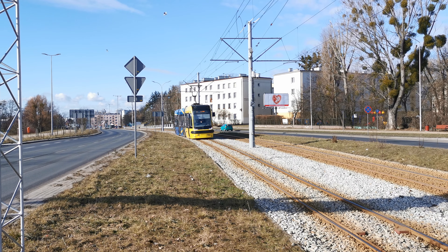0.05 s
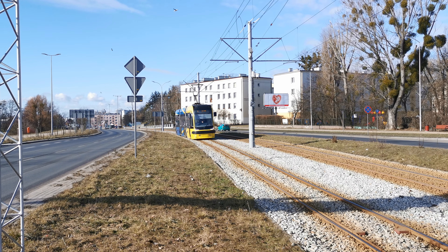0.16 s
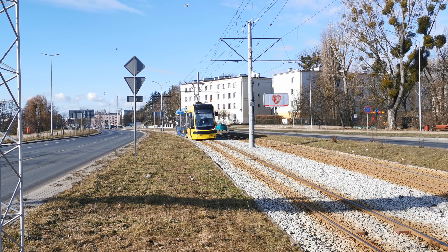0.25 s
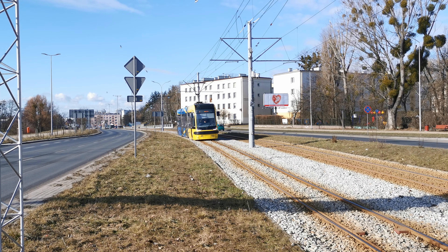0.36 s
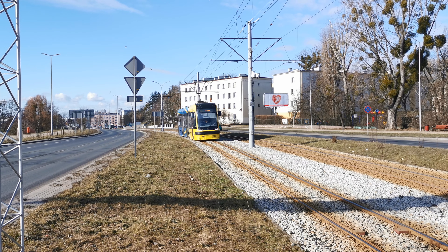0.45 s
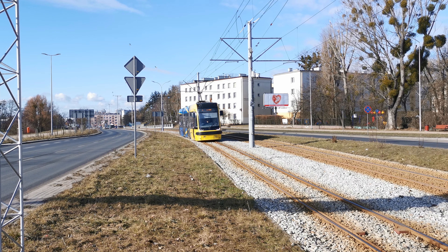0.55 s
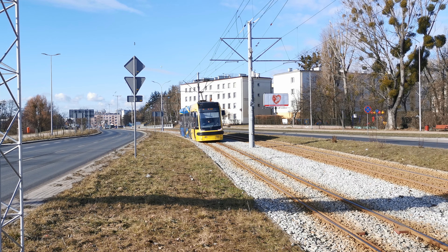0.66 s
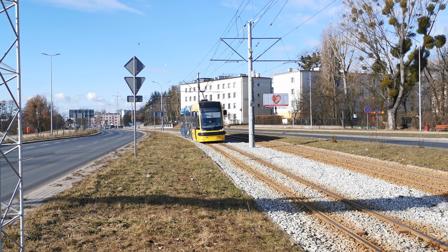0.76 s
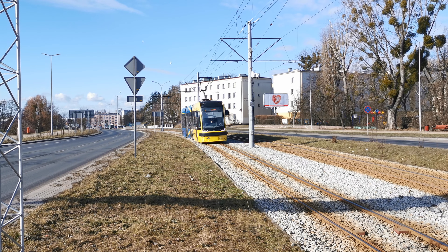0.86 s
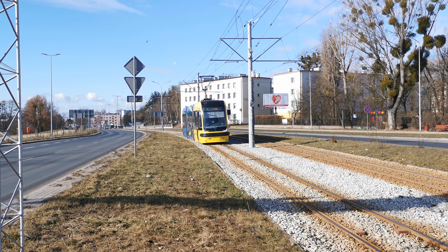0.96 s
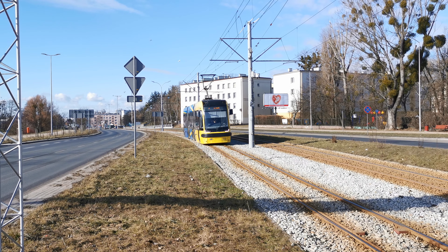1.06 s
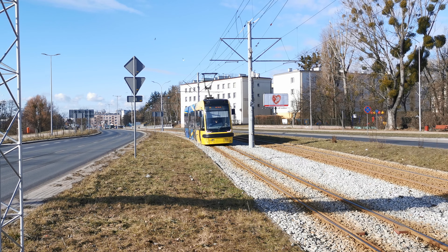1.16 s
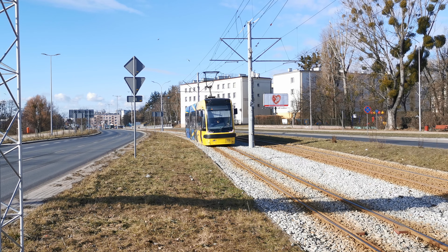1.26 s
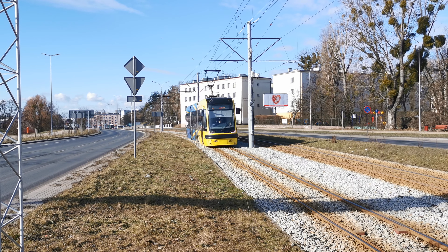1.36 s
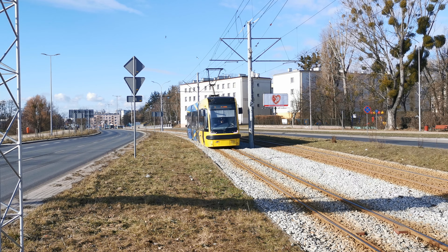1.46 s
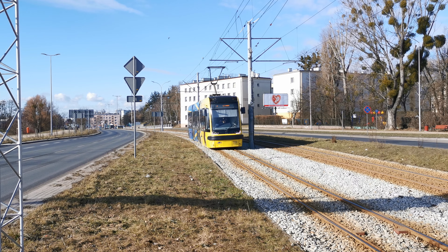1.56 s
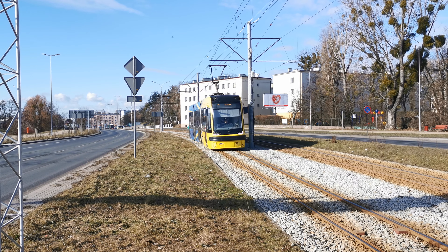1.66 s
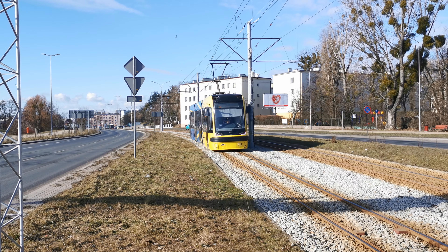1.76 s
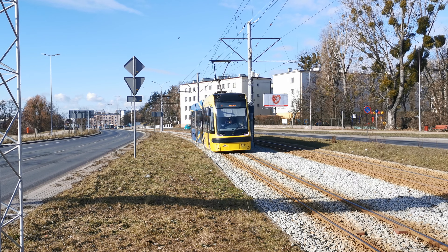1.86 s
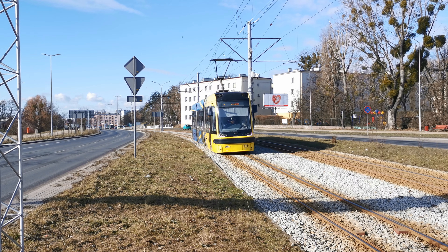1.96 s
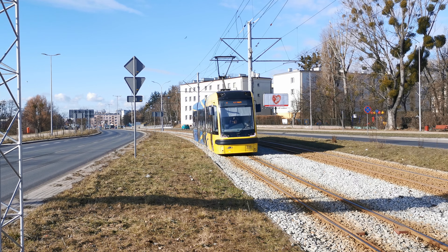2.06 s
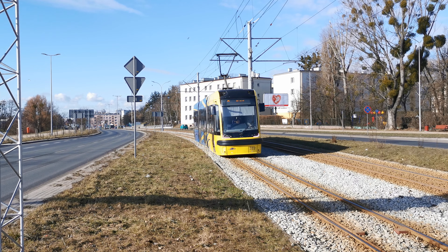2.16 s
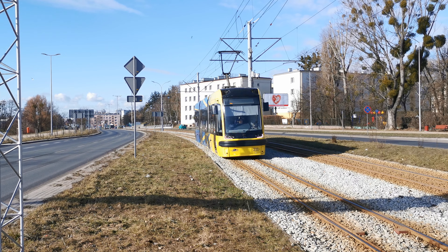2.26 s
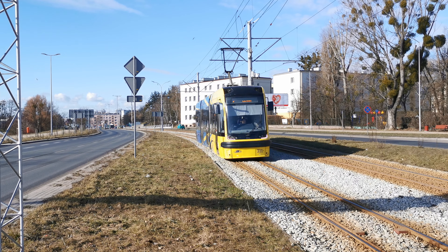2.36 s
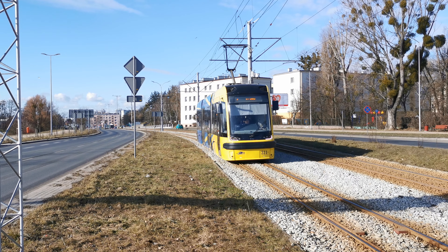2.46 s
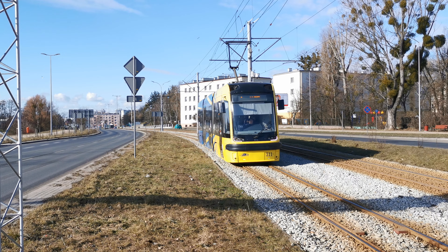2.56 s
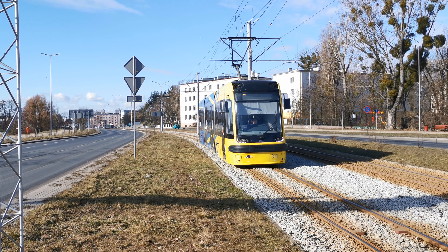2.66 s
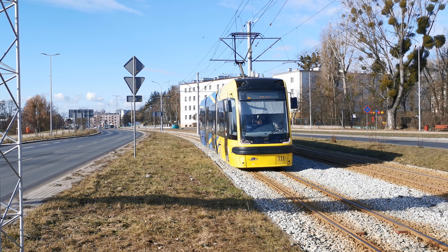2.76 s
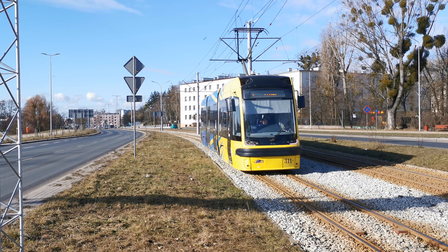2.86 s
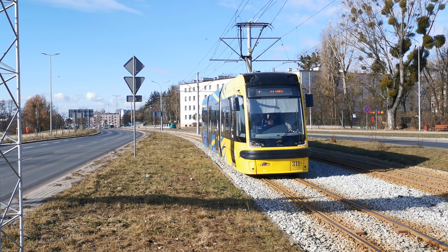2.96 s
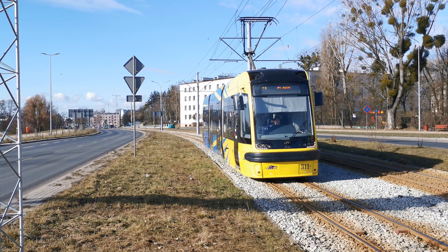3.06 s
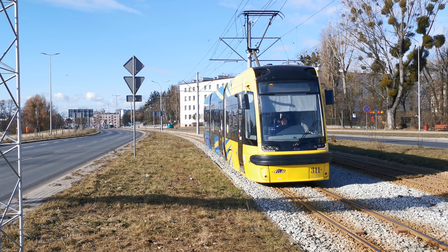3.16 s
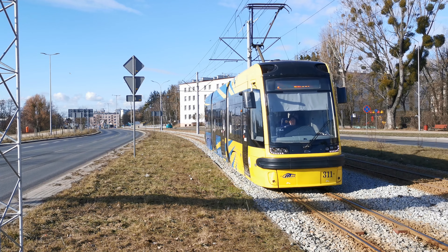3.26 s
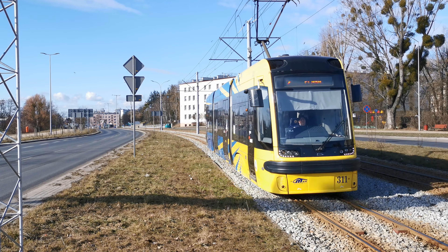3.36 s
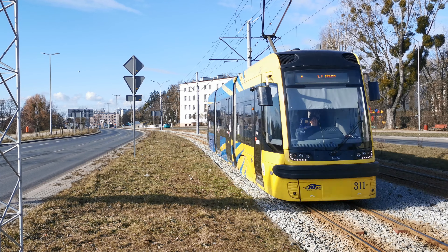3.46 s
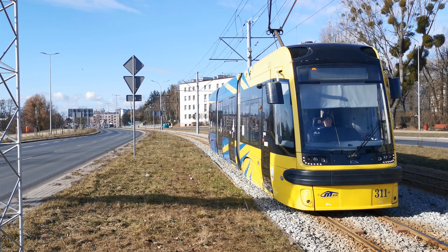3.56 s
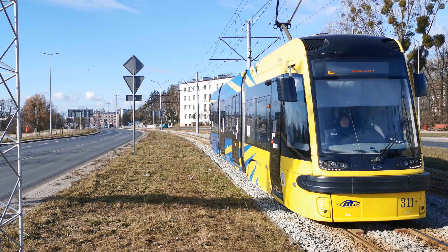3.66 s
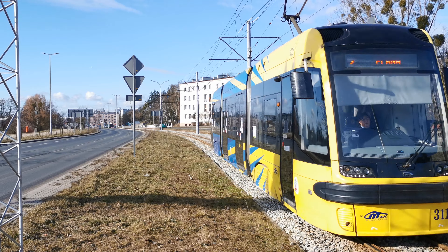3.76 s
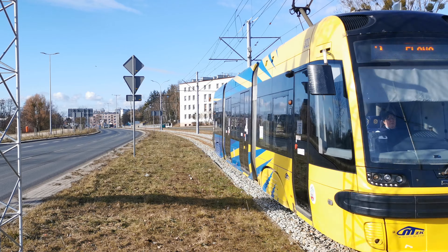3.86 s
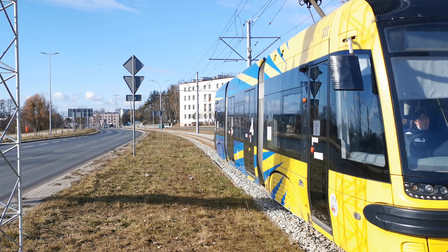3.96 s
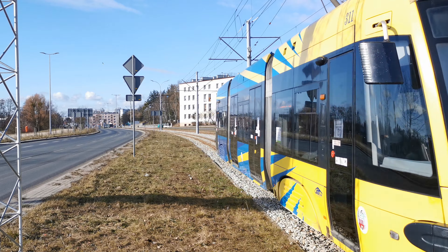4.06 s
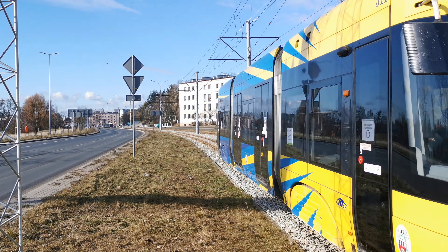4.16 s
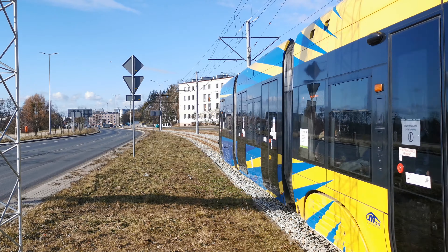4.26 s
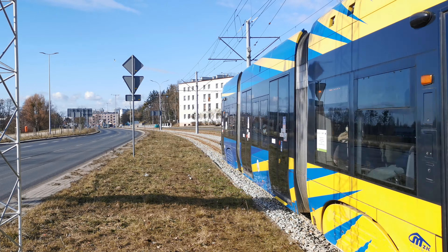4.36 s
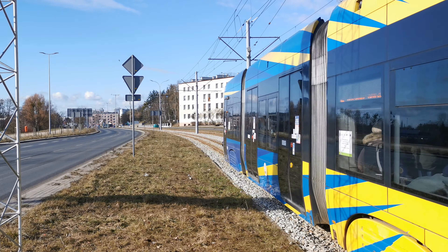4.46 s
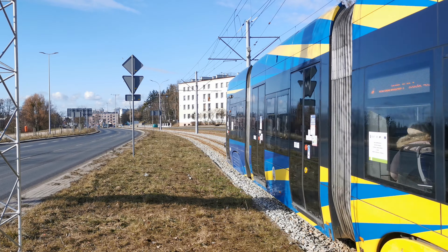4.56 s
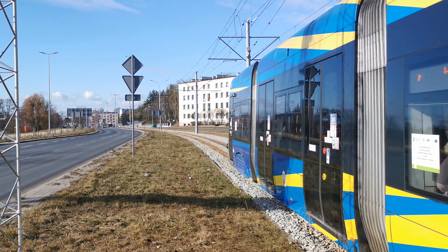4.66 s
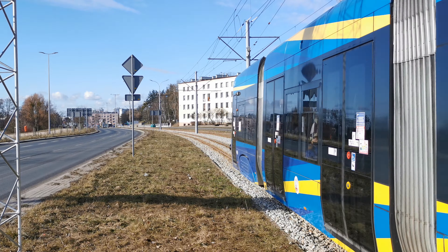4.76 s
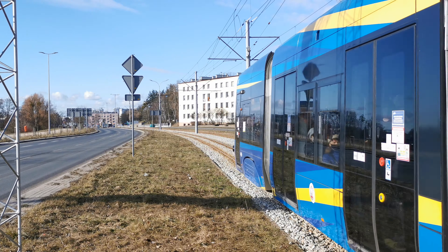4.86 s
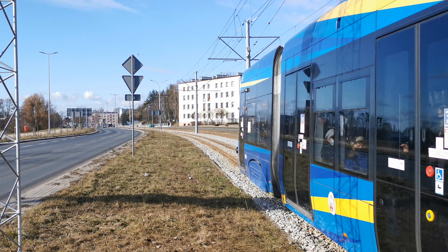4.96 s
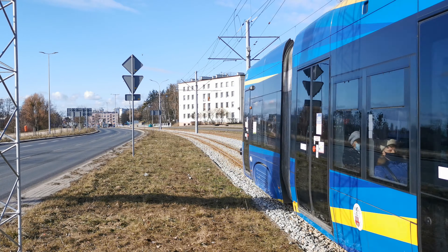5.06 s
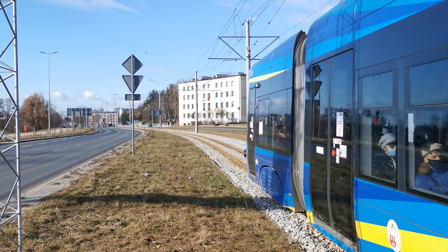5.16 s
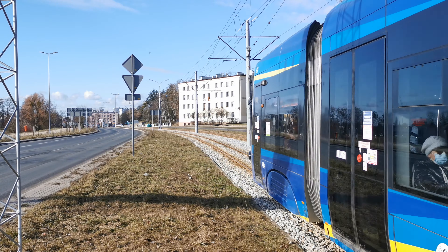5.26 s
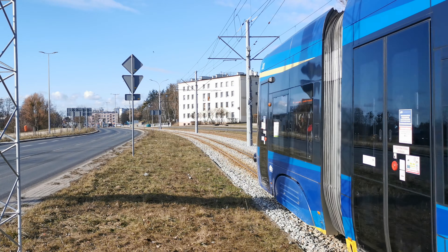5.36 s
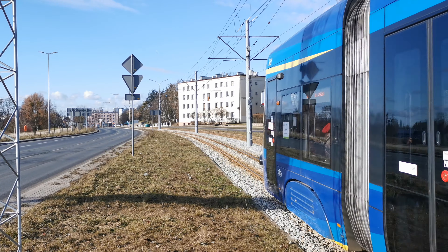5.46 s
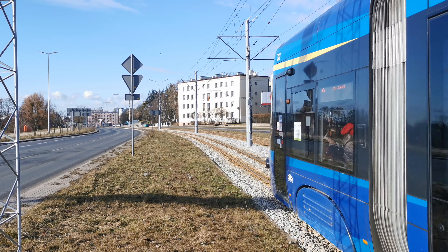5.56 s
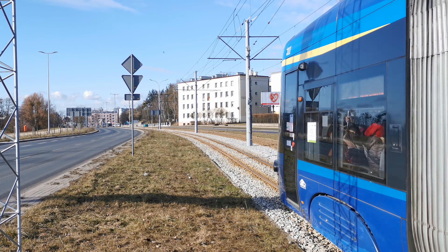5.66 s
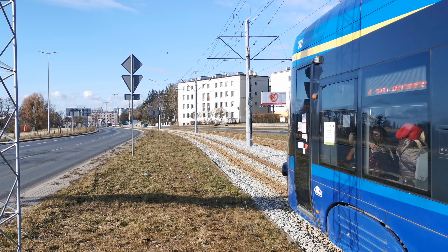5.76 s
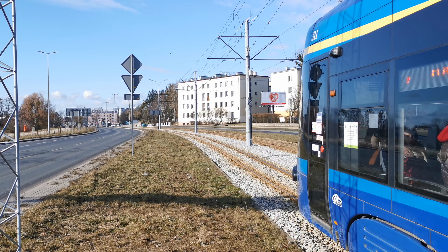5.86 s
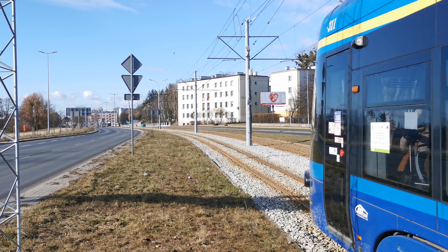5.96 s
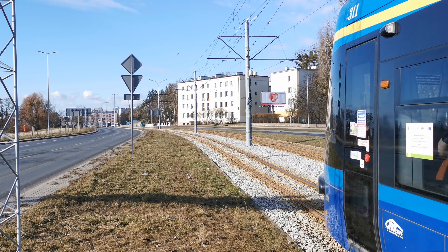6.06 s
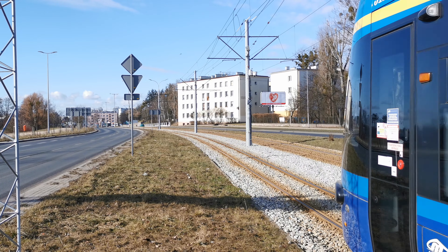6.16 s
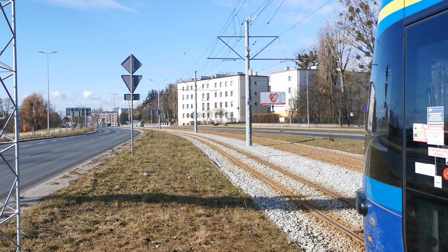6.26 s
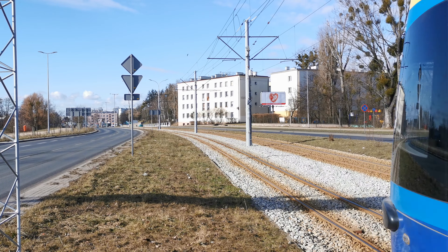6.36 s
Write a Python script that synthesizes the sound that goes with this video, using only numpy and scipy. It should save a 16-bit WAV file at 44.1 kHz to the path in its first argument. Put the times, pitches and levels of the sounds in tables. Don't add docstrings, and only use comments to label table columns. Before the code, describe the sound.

Outdoors beside ballasted track, a hand-held stereo microphone first catches quiet low traffic rumble and close, crisp jacket rustling. Two small buckle taps follow while a distant electric hum slowly sinks in pitch. After four seconds the tram surges past very close: rough wheel roar, throbbing gears, low axle thumps, singing metal and a thin flange squeal, still loud at the end.

```python
import sys
import numpy as np
from scipy import signal
from scipy.fft import rfft, irfft, next_fast_len
from scipy.io import wavfile
from scipy.ndimage import uniform_filter1d, map_coordinates

SR = 44100
rng = np.random.default_rng(int(sys.argv[2]) if len(sys.argv) > 2 else 0)


def undo_db(level):
    steps = np.asarray(level, float) / 20
    return 10 ** steps


def wav_out(sig):
    wavfile.write(sys.argv[1], SR, np.round(np.clip(np.atleast_2d(sig).T, -1, 1) * 32767).astype(np.int16))


N = 283284
ABREAST_DB = -32


def unit(x):
    return x / np.sqrt(np.mean(x ** 2) + 1e-20)


def along(points, hz):
    f, v = np.transpose(points)
    return np.interp(np.log(hz + 1), np.log(f + 1), v)


def curves(rows):
    s, *cols = np.transpose(rows)
    return [np.interp(np.arange(N) / SR, s, c) for c in cols]


def wobble(rate):
    coarse = np.arange(0, N + 32, 32)
    knots = rng.standard_normal(int(N * rate / SR) + 4)
    return np.interp(np.arange(N), coarse, map_coordinates(knots, [coarse * rate / SR]))


def filtered(x, response):
    m = next_fast_len(N + 8192)
    return irfft(rfft(x, m) * response(np.fft.rfftfreq(m, 1 / SR)), m)[..., :N]


def tone(hz):
    return np.sqrt(2) * np.sin(2 * np.pi * np.cumsum(hz) / SR)


def swells(at_s, db, rise_s, fall_s, hold_s=0):
    coarse = np.arange(0, N + 32, 32)
    t = coarse / SR - np.c_[at_s]
    u = np.minimum(t, 0) / np.c_[rise_s] + np.maximum(t - np.c_[hold_s], 0) / np.c_[fall_s]
    return np.interp(np.arange(N), coarse, (undo_db(np.c_[db]) * np.exp(-u ** 2)).sum(axis=0))


def placed(rows, shape, length_s):
    out, t = np.zeros(N + SR), np.arange(int(length_s * SR)) / SR
    for s, *settings in rows:
        out[round(s * SR):][:len(t)] += shape(t, *settings)
    return out[:N]


def singing(modes):
    out = np.zeros((2, N))
    drive = rng.standard_normal((2, N))
    for s0, s1, hz, width, db in modes:
        span = slice(round(s0 * SR), min(round(s1 * SR), N))
        pole = np.exp((-1.5 * np.pi * width + 2j * np.pi * hz) / SR)
        a, b = signal.lfilter([1], [1, -2 * pole, pole ** 2], drive[:, span]).imag
        swell = np.abs(np.sin(np.pi * (np.arange(N)[span] / SR - s0) / (s1 - s0))) ** 0.69
        out[:, span] += undo_db(db) * swell * unit(np.array([a + .5 * b, a - .5 * b]))
    return out


# frequency in Hz, correlation from 0 to 1.
PORT_LIKENESS = [(30, 0.92), (60, 0.98), (150, .975), (300, .97), (600, 0.87), (1050, .78), (1500, .5),
                 (2100, .6), (3000, 0.6), (5000, 0.3), (10000, 0.085)]


def rush(spectrum, patchy_db, alike=PORT_LIKENESS, modes_db=0):
    z = signal.stft(rng.standard_normal((2, N), dtype=np.float32), nperseg=512)[2]
    field = uniform_filter1d(rng.standard_normal(z.shape[1:]), size=3, axis=0)
    field = uniform_filter1d(field, size=10, axis=1)
    patches = undo_db(patchy_db * unit(field)).astype(np.float32)
    pair = signal.istft(z * patches, nperseg=512)[1][:, :N]
    spacing_hz = 28
    comb = rng.standard_normal(SR // spacing_hz)

    def mid_side(hz):
        turn = np.arccos(np.clip(along(alike, hz), -1, 1)) / 2
        modes = modes_db * np.interp(hz / spacing_hz, np.arange(len(comb)), comb)
        return undo_db(along(spectrum, hz) + modes) * [np.cos(turn), np.sin(turn)]

    mid, side = filtered(pair, mid_side)
    return unit(np.array([mid + side, mid - side]))


# frequency in Hz, density in dB per Hz.
RUMBLE = [(18, -18), (28, -15), (40, -2.5), (50, -1.5), (65, -6), (85, -5.5), (105, -21), (140, -35),
          (220, -120)]
SLEEPER = [(50, -30), (85, -2.5), (151, 0), (199, -2), (220, -9), (290, -11), (480, -120)]
BODY = [(190, -120), (210, 5), (330, 4.5), (400, 0), (480, -7.5), (600, -11), (760, -120)]
# centre in seconds, level in dB.
LUMPS = [(.4, -52), (1.05, -46), (1.39, -42), (1.78, -42), (2.22, -45), (2.45, -58), (2.7, -43), (3.0, -46),
         (3.8, -45), (3.98, -41), (4.46, -36), (4.85, -55), (5.3, -52), (5.6, -39), (5.78, -30.5),
         (6.01, -31), (6.24, -38)]
# centre in seconds, level in dB.
DRUMS = [
    (4.31, -31.5),
    (4.5, -39),
    (5.7, -34),
    (5.9, -32),
    (6.01, -38),
    (6.27, -55),
]


def ground():
    near_db, load_db = curves(ROLL)[0] - ABREAST_DB, curves(GEARS)[0] - ABREAST_DB
    lead_s = 0.22
    ahead_db = np.interp(np.arange(N) + lead_s * SR, np.arange(N), near_db)
    lump_s, drum_s = 0.036, 0.063
    rumble = undo_db(-40 + 0.23 * near_db) + swells(*np.transpose(LUMPS), lump_s, 1.3 * lump_s)
    sleeper = undo_db(-35 + 0.71 * ahead_db) + swells(*np.transpose(DRUMS), drum_s, drum_s)
    low = rumble * rush(RUMBLE, patchy_db=-1.0)
    low = low + sleeper * undo_db(1.1 * wobble(18)) * rush(SLEEPER, patchy_db=-1.5)
    body_db = -33.5 + 0.71 * near_db + 0.2 * load_db + 4.0
    return low + undo_db(body_db) * rush(BODY, patchy_db=3.0)


# frequency in Hz, density in dB per Hz.
CRISP = [(6060, -37), (10300, -9), (10800, 2), (12200, 4.5), (14300, 2.5), (15400, 1)]


def crisp_noise():
    return rush(CRISP, patchy_db=1.5, alike=[(3000, 0.19), (9000, 0.023)], modes_db=3.0)


# frequency in Hz, density in dB per Hz.
DULL = [(1200, -50), (2200, -21), (3000, -7), (3220, -15), (3520, -3.5), (3820, -9), (4580, -2),
        (5460, -10.5), (6680, -8), (7620, -11), (8220, -15.5), (8860, -8.5), (9320, -14.5), (10000, -24),
        (13000, -48), (22000, -120)]


def dull_noise():
    return rush(DULL, patchy_db=2.5, alike=[(3000, 0.19), (9000, 0.023)], modes_db=2.0)


# start in seconds, hold in seconds, crisp level in dB, dull level in dB.
RUSTLE = [(0.012, 0.11, -69, -64.5), (0.143, 0.052, -94, -69), (0.25, 0.026, -73, -77),
          (0.42, .05, -68.5, -77), (0.58, 0.22, -63, -66), (0.785, 0.13, -64, -61.5),
          (0.94, 0.034, -92, -65), (1.058, 0.079, -67, -64.5), (1.235, 0.089, -66, -63.5),
          (1.363, 0.099, -77, -80), (1.524, 0.075, -72, -71), (1.738, 0.059, -71, -69),
          (1.847, .05, -82, -88), (1.966, .08, -98, -83), (2.175, 0.11, -71, -89), (2.35, 0.1, -71, -86),
          (2.54, 0.15, -71, -78), (2.786, 0.17, -76, -73), (3.05, 0.087, -80, -85),
          (3.247, 0.083, -73, -89)]
# start in seconds, peak in dB.
CREASES = [(0.0258, -59), (0.0403, -52), (0.0827, -50), (0.7771, -54), (1.2201, -56), (1.737, -58),
           (1.8517, -61), (1.8996, -61), (0.2344, -67), (0.399, -61), (0.5641, -62), (0.634, -63),
           (0.7627, -55), (0.8515, -55), (1.0286, -50), (1.2017, -58), (1.5194, -63), (1.7005, -60),
           (1.8407, -52), (2.3431, -72), (2.5192, -62)]
# start in seconds, end in seconds, frequency in Hz, width in Hz, level in dB.
SQUEAKS = [(.02, .14, 4600, 252, -84), (.12, .165, 4200, 250, -64), (.17, .22, 4250, 250, -59),
           (.31, .37, 4200, 400, -70), (1.09, 1.14, 3700, 150, -66), (1.09, 1.145, 4650, 200, -58),
           (.72, .92, 4600, 200, -68), (.42, .56, 4700, 204, -69), (.6, .72, 4500, 200, -64),
           (.91, .99, 4150, 200, -59), (1.04, 1.18, 4550, 200, -65), (1.24, 1.33, 4460, 300, -65),
           (1.54, 1.63, 4600, 250, -64), (1.72, 1.84, 4530, 250, -68), (.04, .18, 7000, 400, -66),
           (.6, 1.0, 6100, 250, -68), (1.22, 1.36, 6330, 250, -69), (1.83, 1.9, 14700, 500, -58)]


def jacket():
    start_s, hold_s, crisp_db, dull_db = np.transpose(RUSTLE)

    def rub(db, rest_db, holds):
        fall_s = 0.014 + (1 - holds) * hold_s
        return undo_db(rest_db) + swells(start_s, db, 0.015, fall_s, holds * hold_s)

    grain = 1.6 * wobble(150) + 1.5 * wobble(35)
    snap = lambda t, db: undo_db(db - 10 - 60 * t / 0.13) + undo_db(db - 14 - 60 * t / 0.02)
    snaps = placed(CREASES, snap, 0.1)
    crisp = (rub(crisp_db, -78.5, 0.33) * undo_db(-2.5 + grain) + snaps) * crisp_noise()
    dull = (rub(dull_db, -74, 0.73) * undo_db(-1.5 + grain) + 0.067 * snaps) * dull_noise()
    return crisp + dull + undo_db(-3.0 + 1.9 * wobble(69.7) + grain) * singing(SQUEAKS)


# start in seconds, peak in dB.
TAPS = [
    (2.041, -52),
    (2.2344, -69),
    (2.804, -50.5),
]
# start in seconds, peak in dB.
CLINKS = [
    (1.9969, -62),
    (2.765, -60),
]
# frequency in Hz, level in dB, 60 dB decay in seconds.
BUCKLE = [(3280, 8, .06), (3500, 0, .04), (3890, 3, .05), (4330, 3, .04), (5130, 2, .04), (5680, 1, .06),
          (6030, 0, .05), (6330, -2, .09), (7500, -6, .06), (8060, -8, .05)]
PIN = [(4200, 9, .06), (5000, 9, .06), (5680, -4, .08), (6160, 5, 0.19), (7160, -4, .05), (8470, -8, .08)]


def strap_buckle():
    def ring(modes):
        def strike(t, db):
            parts = [undo_db(level + rng.normal(0, 1.9) - 60 * t / t60) * np.sin(2 * np.pi * hz * t)
                     for hz, level, t60 in modes]
            return undo_db(db - 9.5) * sum(parts) * (1 - np.exp(-t / .002))
        return strike

    metal = placed(TAPS, ring(BUCKLE), 0.1) + placed(CLINKS, ring(PIN), 0.1)
    brush = placed([*TAPS, *CLINKS], lambda t, db: undo_db(db - 16 - 60 * t / 0.088), 0.1)
    return metal + brush * dull_noise()


# start in seconds, peak in dB.
SPARKS = [
    (4.6144, -52),
    (4.8444, -46),
    (6.2244, -51),
]


def collector():
    crackle = placed(SPARKS, lambda t, db: undo_db(db - 5 - 60 * t / 0.05), 0.1)
    return crackle * (crisp_noise() + 0.067 * dull_noise())


# start in seconds, peak in dB, frequency in Hz, hold in seconds.
JOINTS = [(3.931, -24, 131, 0.034), (4.283, -21.5, 139, 0.028), (4.305, -18, 169, 0.024),
          (4.507, -18.5, 171, 0.014), (4.527, -18.5, 179, 0.012), (4.836, -22, 179, 0.01),
          (5.234, -21.5, 124, 0.038), (5.383, -20.5, 163, 0.011), (5.536, -23, 173, 0.028),
          (5.618, -15, 151.4, 0.024), (5.676, -28, 130, .006), (5.816, -23, 139, 0.01),
          (5.882, -11, 154, 0.0042), (5.903, -28, 166.3, 0.094), (5.982, -18.5, 121, 0.012),
          (6.229, -17, 111, 0.0086), (6.246, -24, 126, 0.0068)]
# start in seconds, peak in dB, 60 dB decay in seconds.
KNOCKS = [
    (5.772, -13.5, 0.05),
    (5.97, -20, 0.053),
    (5.997, -18.5, 0.05),
    (6.2008, -17, 0.05),
]
# frequency in Hz, density in dB per Hz.
KNOCK = [(300, -30), (700, -14), (1200, 5), (1700, -8), (2500, -6), (3200, -14), (6000, -46)]


def joints():
    def thump(t, db, hz, hold_s):
        swell = (1 - np.exp(-t / 0.0034)) * undo_db(-60 * np.maximum(t - hold_s, 0) / 0.057)
        ring = np.sin(2 * np.pi * hz * t) + 0.4 * np.sin(2 * np.pi * 1.4 * hz * t)
        return undo_db(db) * ring * swell

    knock = lambda t, db, t60: undo_db(db - 5 - 60 * t / t60) * (1 - np.exp(-t / .001))
    return placed(JOINTS, thump, 0.5) + placed(KNOCKS, knock, 0.5) * rush(KNOCK, patchy_db=-1.0)


# start in seconds, end in seconds, frequency in Hz, width in Hz,
# level in dB.
WHINE = [(2.0, 4.1, 1165, 70, -63), (2.1, 4.1, 1890, 110, -65), (2.1, 4.3, 2620, 110, -68),
         (2.4, 4.0, 3890, 130, -70), (5.35, 5.65, 3830, 70, -52), (4.33, 4.52, 1490, 60, -34),
         (4.45, 4.8, 1380, 110, -36), (4.65, 5.05, 1620, 170, -33.5), (5.2, 5.7, 1480, 90, -38),
         (4.3, 4.65, 1980, 110, -41), (4.4, 5.35, 420, 130, -33), (4.4, 5.3, 2640, 160, -43),
         (4.9, 5.9, 4850, 120, -56), (5.6, 6.5, 1330, 120, -34), (6.17, 6.26, 1310, 90, -33),
         (5.66, 5.9, 1330, 250, -41), (4.5, 4.68, 1480, 120, -38), (4.15, 4.35, 1250, 300, -47),
         (4.55, 4.66, 2600, 120, -42), (4.74, 4.9, 2620, 140, -43), (6.22, 6.34, 2620, 120, -40),
         (4.35, 4.95, 1280, 250, -36), (5.85, 6.12, 340, 120, -32), (5.3, 5.45, 420, 60, -35),
         (5.7, 6.5, 1045, 50, -38), (5.72, 5.86, 2600, 200, -42), (5.94, 6.03, 2500, 220, -35.5),
         (6.03, 6.36, 2600, 220, -35.5), (6.15, 6.6, 2420, 160, -37.5), (4.13, 4.45, 2100, 350, -46),
         (4.8, 5.3, 2600, 200, -43), (6.1, 6.7, 3560, 130, -37.5), (6.15, 6.7, 4740, 70, -46),
         (6.1, 6.5, 4410, 60, -52), (5.7, 6.7, 6840, 90, -64), (3.98, 4.35, 615, 15, -50),
         (4.03, 4.4, 540, 15, -51), (4.05, 4.45, 1120, 220, -46)]
# time in seconds, frequency in Hz, level in dB.
SQUEAL = [(2.9, 4090, -110), (3.7, 4090, -77), (4.05, 4090, -65), (4.3, 4085, -62), (4.52, 4080, -61),
          (4.6, 4075, -50.5), (4.72, 4065, -52), (4.82, 4060, -54), (4.93, 4040, -43), (5.03, 4020, -44),
          (5.08, 4005, -51), (5.2, 3985, -43.5), (5.3, 3975, -49), (5.5, 3960, -48), (5.7, 3935, -54),
          (5.95, 3900, -58)]


def whine():
    hz, db = curves(SQUEAL)
    upper = undo_db(2.5 * wobble(35)) * tone(hz + 11 * wobble(70))
    lower = undo_db(-4 + 2.5 * wobble(45)) * tone(hz - 120 + 22 * wobble(70))
    return undo_db(1.1 * wobble(20)) * singing(WHINE) + undo_db(db - 1.5) * (upper + lower)


# time in seconds, nearness as rail level in dB, view under the skirts in dB.
ROLL = [(0, -62, -2), (1.9, -61.5, -1), (2.8, -59.5, 2.5), (3.65, -53.5, -3), (3.92, -53, -3),
        (4.08, -49, 0), (4.24, -39, -9.5), (4.38, -32, -14.5), (4.58, -31, -7), (4.77, -31, -3.5),
        (4.94, -30, -2.5), (5.1, -31.5, 0), (5.4, -32, 0.5), (5.63, -34, 1.5), (5.78, -34.5, 0),
        (5.95, -33.5, 1), (6.15, -31, 1), (6.42, -30.5, 0)]
# frequency in Hz,
# density in dB per Hz.
RAIL = [(320, -24), (550, -2.5), (760, -2.5), (1040, -2), (1330, -3.5), (1530, -2), (1770, -4),
        (2100, -8.5), (2730, -16), (4620, -120)]
WHEEL = [(1060, -50), (1800, 4.5), (2160, -2), (2610, -0.5), (3070, -9.5), (3300, -6), (4290, -46),
         (7260, -120)]
WEB = [(1820, -13.5), (3100, 3.5), (3970, -0.5), (4350, -6), (4850, -4.5), (5350, -11.5), (6880, -19),
       (7410, -36), (8200, -39), (10700, -60), (18000, -120)]
HISS = [(4590, -31), (7800, -6.5), (8280, -14.5), (9160, -3), (9940, -9.5), (10800, -1.5), (11400, -4),
        (15300, -18)]
SIZZLE = [(3000, -43), (4500, 2.5), (6000, -6), (8800, -12.5), (10000, -16.5), (13000, -34)]
# centre in seconds, level in dB.
AXLES = [
    (4.58, -41),
    (4.85, -57),
    (5.22, -61),
    (5.74, -48),
    (6.01, -37.5),
    (6.2, -37),
    (6.3, -61),
]
# centre in seconds, level in dB, half length in seconds.
SHOES = [
    (4.1, -72, .15),
    (4.945, -62.5, 0.23),
    (6.3, -71, .15),
]


def rolling():
    near_db, view_db = curves(ROLL)
    chatter = 0.5 * wobble(12) + 0.67 * wobble(45)

    def heard(db, grows, view):
        return undo_db(ABREAST_DB + db + grows * (near_db - ABREAST_DB) + view * view_db + chatter)

    axle_s = 0.07
    rim_gain = heard(-11, 0.79, 0.53) + swells(*np.transpose(AXLES), axle_s, 0.66 * axle_s)
    at_s, shoe_db, half_s = np.transpose(SHOES)
    hiss_gain = heard(-26.5, 1.9, 0.44) + swells(at_s, shoe_db, half_s, half_s)
    rail = heard(0.94, 1.0, 0) * rush(RAIL, patchy_db=0.74, modes_db=1.5)
    rims = rim_gain * rush(WHEEL, patchy_db=3.0, modes_db=1.5)
    webs = heard(-4.5, 1.12, 0.69) * rush(WEB, patchy_db=1.0, modes_db=2.5)
    hiss = hiss_gain * rush(HISS, patchy_db=2.0, modes_db=1.5)
    arriving = np.clip(np.arange(N) / SR / 5.1, 0, 1) ** 3
    sizzle_gain = arriving * heard(-55.5 - ABREAST_DB, 0.11, 0)
    return rail + rims + webs + hiss + sizzle_gain * rush(SIZZLE, patchy_db=1.3, modes_db=2.5)


# time in seconds, frequency in Hz.
MESH = [(0, 349), (.8, 343), (1.6, 333), (2.4, 322.5), (3, 308.5), (3.6, 297.5), (4.2, 286.5), (4.8, 269),
        (5.2, 255.5), (5.6, 243), (6, 236), (6.42, 222.5)]
# time in seconds, mesh level in dB.
GEARS = [(0, -65), (1.7, -62), (2.3, -54), (3.0, -58.5), (3.33, -58), (3.55, -47), (3.85, -41),
         (4.05, -44.5), (4.2, -27), (4.42, -65), (4.68, -29), (4.92, -22), (5.06, -22), (5.45, -36),
         (5.7, -42), (5.9, -23), (6.05, -44), (6.42, -37)]
# centre in seconds, level in dB.
THROBS = [(4.25, -30.5), (4.33, -31), (4.4, -35), (4.47, -28.5), (4.525, -32), (4.585, -22.5),
          (4.64, -26.5), (4.7, -24.5), (4.77, -27.5), (4.83, -26.5), (4.89, -25), (4.935, -23.5),
          (5.01, -27), (5.09, -31), (5.17, -31), (5.205, -29), (5.245, -28), (5.39, -29), (5.45, -50),
          (5.55, -37.5), (5.62, -32), (5.7, -30.5), (5.819, -30), (5.9, -28), (5.99, -27), (6.049, -23),
          (6.12, -25.5), (6.19, -25.5), (6.27, -26), (6.23, -37), (6.34, -22.5), (6.41, -23.5)]
# centre in seconds, level in dB.
IN_STEP = [(.9, -67), (1.88, -57), (2.02, -62), (2.32, -56), (2.45, -45), (2.76, -48), (2.87, -51),
           (3.2, -52), (3.42, -51.5), (3.52, -46.5), (3.99, -36.5)]
# centre in seconds, level in dB, half length in seconds.
STRAIN = [
    (4.414, -42, 0.49),
    (4.75, -35.5, 0.22),
    (5.5, -41, 0.15),
    (6.093, -52, 0.063),
]
# centre in seconds, level in dB, half length in seconds.
DRIVES = [
    (4.324, -55, 0.092),
    (4.82, -40, .08),
    (5.02, -36, 0.089),
    (5.204, -32.5, 0.096),
    (5.483, -38, 0.16),
    (6.084, -38.5, 0.1),
    (6.3, -34, 0.098),
    (6.43, -25, 0.037),
]


def gears():
    hz = curves(MESH)[0] * (1 + 0.0033 * wobble(16))
    steady_db = curves([(4.15, 0), (4.3, -17)])[0]
    db = curves(GEARS)[0] + steady_db
    bites = swells(*np.transpose(THROBS), 0.028, 0.028)
    in_step = swells(*np.transpose(IN_STEP), 0.045, 0.79 * 0.045)
    haze = wobble(70) * tone(hz) + wobble(70) * tone(hz + 25 * wobble(9))
    mesh = (undo_db(db) + bites + in_step) * undo_db(1.0 * wobble(19)) * (tone(hz) + undo_db(-16) * haze)
    teeth = 18
    sides = tone(hz * (1 - 1 / teeth))
    sides = sides + undo_db(-24) * tone(hz * (1 - 2 / teeth)) + undo_db(-5.5) * tone(hz * (1 + 2 / teeth))
    at_s, strain_db, span_s = np.transpose(STRAIN)
    side_gain = undo_db(db - 17 - 0.5 * wobble(6.5)) + swells(at_s, strain_db, span_s, span_s)
    s, octave_db, half_s = np.transpose(DRIVES)
    octave = undo_db(1.4 * wobble(18)) * tone(2 * hz + 16 * wobble(45))
    return mesh + side_gain * sides + swells(s, octave_db, half_s, half_s) * octave


# time in seconds, samples by which left lags right.
LAG = [(0, -6), (2.5, -7.5), (3.9, -4.5), (4.25, 0), (4.6, -2.5), (5, 10), (5.55, 10.5), (5.9, 3),
       (6.42, 8)]
# frequency in Hz, radians by which right leads.
CASING = [(1500, 2.5), (1720, 2.6), (2070, 2), (2410, .1), (2760, -1.4), (3100, -3), (3620, -4.3),
          (4130, -6.8), (5860, -12)]
# time in seconds, left minus right in dB.
PAN = [(0, -2), (4.2, 0), (5, 0), (5.4, -4), (6.42, 0)]


def passing(x):
    half = curves(LAG)[0] / 2
    share = lambda hz: np.clip((hz - 1550) / 100 + .5, 0, 1)
    low = filtered(x, lambda hz: 1 - share(hz))
    high = filtered(x, lambda hz: share(hz) * np.exp(1j * along(CASING, hz) * [[-.5], [.5]]))
    left = np.interp(np.arange(N) - half, np.arange(N), low[0])
    right = np.interp(np.arange(N) + half, np.arange(N), low[1])
    return (high + [left, right]) * undo_db(curves(PAN)[0] * [[.5], [-.5]])


def scene():
    tram = ground() + joints() + whine() + rolling() + gears()
    return jacket() + strap_buckle() + collector() + passing(tram)


def band_limit(x):
    return signal.sosfilt(signal.butter(12, 15750, fs=SR, output="sos"), x)


# frequency in Hz, left minus right in dB.
PORTS = [(60, 1), (500, 0.3), (1000, 1), (2000, 0.5), (2800, -3), (4000, 3.5), (6000, -5.5), (7500, 4.5),
         (8500, 9), (15000, 7)]
# time in seconds, share lost from 13.1 to 14.4 kHz, share lost above.
LOST_TREBLE = [(5.21, 0, 0), (5.25, 1, 1), (5.53, 1, 1), (5.56, 0, 1), (5.69, 0, 1), (5.71, 0, 0)]


def record(dry):
    heard = filtered(dry, lambda hz: undo_db(along(PORTS, hz) * [[.5], [-.5]]) * (hz < 15750))
    split = lambda hz: np.array([[(hz > 13100) & (hz <= 14400)], [hz > 14400]])
    lost = np.array(curves(LOST_TREBLE))[:, None] * filtered(heard, split)
    mix = heard - lost.sum(axis=0)
    return band_limit(mix)


dry = scene()
out = record(dry)
wav_out(out)
```